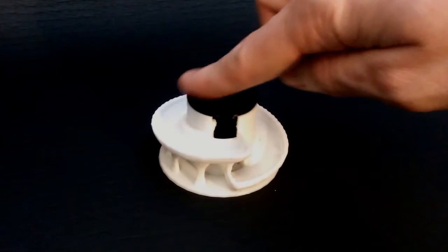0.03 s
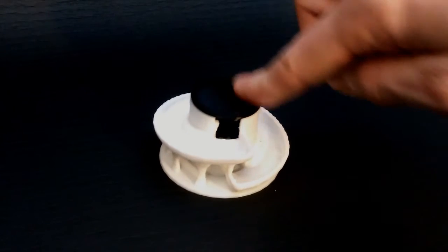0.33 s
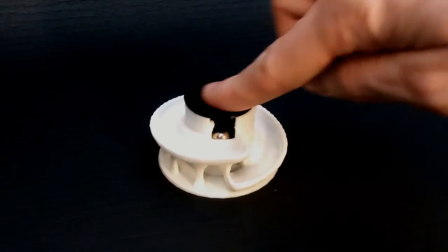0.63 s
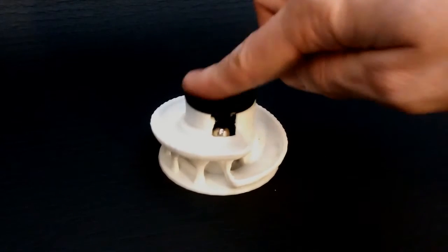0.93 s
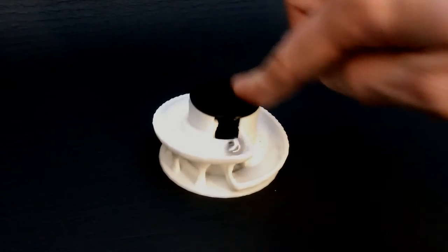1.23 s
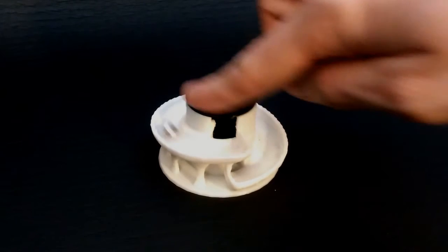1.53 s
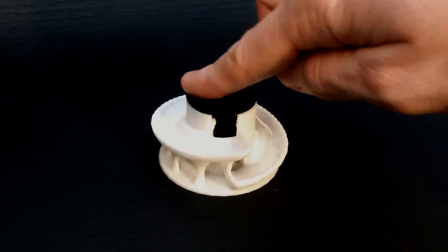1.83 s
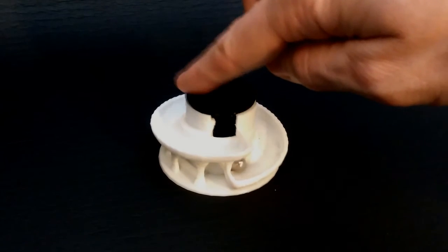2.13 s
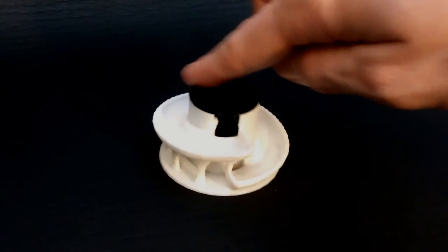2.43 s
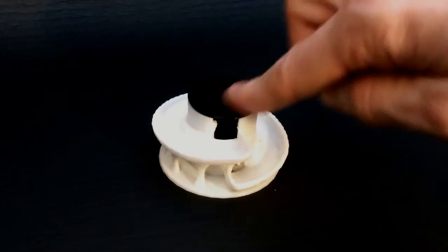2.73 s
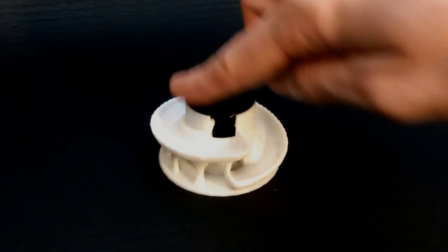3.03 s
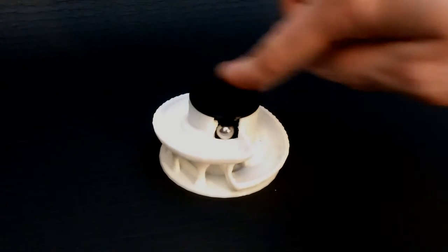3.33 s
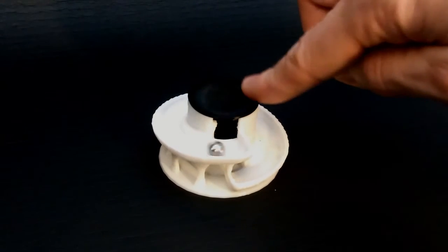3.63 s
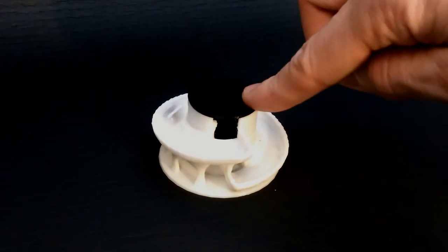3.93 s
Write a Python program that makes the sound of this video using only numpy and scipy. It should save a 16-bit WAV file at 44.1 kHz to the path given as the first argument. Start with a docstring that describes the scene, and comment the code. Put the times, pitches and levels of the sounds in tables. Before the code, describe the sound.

A toy marble run clatters on a tabletop in a small room. Its plastic screw lift knocks and creaks, then a steel ball rattles down the track. The knocking returns and a second roll follows.

```python
"""A toy marble run

A finger turns the screw lift of a small plastic marble run on a tabletop. The screw rubs, creaks and
knocks in its tube; twice a steel ball drops out at the top and rolls, rattling, down the spiral track.
Each contact excites the resonances of the plastic. A small room answers, over a faint rumble and hum
and one distant tick."""
import sys
import numpy as np
from scipy import signal
from scipy.fft import rfft, irfft
from scipy.io import wavfile

SR = 44100
rng = np.random.default_rng(int(sys.argv[2]) if len(sys.argv) > 2 else 0)


def pcm_store(signal):
    """Save signal as 16-bit PCM."""
    levels = np.round(np.clip(np.atleast_2d(signal), -1, 1) * 32767)
    wavfile.write(sys.argv[1], SR, levels.astype(np.int16).T)


N = 176400

# Spectrum of the room's rumble. Each row: frequency in Hz, relative spectral level in dB.
RUMBLE_SPECTRUM = [(25,-13),(60,-3),(135,8),(270,-6),(1500,-10),(7000,-35)]
# Steady hum. Each row: frequency in Hz, rms level in dB.
HUM_TONES = [(198,-78)]
# Decay of the room. Each row: frequency in Hz, time to fall 60 dB in seconds.
ROOM_DECAY = [(300,0.36),(1700,0.17),(5000,0.21)]
# Strength of the reverberation. Each row: frequency in Hz, gain in dB.
REVERB_GAIN = [(400,-1),(1700,-7),(4200,-5),(6000,-7.5)]
# Resonances of the screw in its tube. Each row: frequency in Hz, width in Hz, relative level in dB.
SCREW_MODES = [(403,80,-7),(540,160,-9.5),(854,137,-2.5),(1033,110,-6.5),(1297,372,-0.5),(1615,109,1),(1852,189,3.5),(2090,447,-2.5),(2390,580,-10.5),(4166,660,-15),(5820,794,-8.5)]
# The screw knocks on its tube. Each row: time in seconds, level in dB, relative treble in dB.
SCREW_KNOCKS = [(0.155,-35,-22),(0.2117,-30,-18),(0.367,-26.5,-23.5),(1.0958,-23,-16.5),(2.6783,-29,-22),(2.6946,-30,-28),
                (2.7869,-22.5,-23),(2.8171,-27,-19),(2.9155,-32.5,-18),(3.1774,-32.5,-17),(3.259,-30,-20.5),(3.3014,-22,-25.5)]
# The screw slips free with a pitched tap. Each row: time in seconds, level in dB, ring in Hz.
SCREW_SLIPS = [(0.596,-33.5,1550),(.605,-35.5,1680),(.694,-40.5,1680),(.735,-50.5,1660),(0.794,-45.5,1650),(.821,-45.5,1610),
               (1.01,-38,1600),(1.066,-30,1590),(2.555,-29,1450),(2.589,-38.5,780),(2.592,-24.5,1510),
               (2.64,-37.5,1790),(2.9452,-27,1730),(2.952,-28,1770),(2.972,-36,810),(2.974,-21.5,1585),(3.003,-28.5,1820),(3.032,-28,1460)]
# The screw rubs round. Each row: start in seconds, length in seconds, level in dB, creak pitch in Hz.
SCREW_RUBS = [(0.136,.12,-46.5,1204),(.27,.22,-56,2200),(0.981,0.21,-47,1730),(2.542,.07,-46,1180),(2.701,0.31,-55.5,1150),(2.98,0.11,-43.5,1660),(3.06,0.27,-50.5,1860),(3.235,0.16,-41,1170)]
# Resonances of the track. Each row: frequency in Hz, width in Hz, relative level in dB.
TRACK_MODES = [(396,65,-7),(504,184,-8.5),(856,130,-12.5),(1350,540,-7),(1600,144,-7.5),(1870,133,-0.5),(2083,190,-3),(2393,800,-10),(3460,550,-12.5),(4363,570,-14),(5770,910,-15.5)]
# Timbre of the track where the ball is. Each row: time in seconds, bass gain in dB,
# relative treble of a bounce in dB, ring in Hz.
TRACK_TIMBRE = [(1.3,-2,-22.5,2080),(1.4,-0.5,-19.5,1730),(1.531,5,-16.5,2230),(1.649,-1,-15.5,1810),(1.79,3,-16.5,1840),(2.0,-37,-11.5,1730),(2.169,-11,-14.5,1720),(3.58,1,-21.5,2030),(3.9,0,-22,2340)]
# The ball strikes the track. Each row: time in seconds, level in dB.
BALL_BOUNCES = [(1.2175,-31),(1.2415,-28.5),(1.2809,-37.5),(1.316,-25),(1.3964,-35),(1.4721,-31.5),(1.518,-35),(1.5466,-31),(1.589,-33),
                (1.6756,-32.5),(1.7192,-42),(1.729,-32),(1.7609,-25.5),(1.7735,-24.5),(1.8339,-28),(1.864,-43),(1.906,-35.5),
                (2.0315,-32),(2.0797,-32.5),(2.1076,-35.5),(2.1646,-31),(2.2078,-34.5),(2.3304,-37),(3.5428,-41),(3.5658,-53),(3.577,-21.5),(3.5823,-30.5),
                (3.6091,-29),(3.661,-39.5),(3.752,-35),(3.7836,-48),(3.8144,-39),(3.8708,-35),(3.9042,-30.5),(3.918,-34.5)]
# Rolling, one list for each run of the ball. Each row: time in seconds, level in dB.
BALL_RUNS = [
    [(1.22,-51.5),(1.35,-52.5),(1.58,-48),(1.97,-45),(2.13,-56),(2.3,-84)],
    [(3.54,-50.5),(3.62,-52),(3.73,-62.5),(3.8,-47.5),(3.88,-54.5),(4,-45)],
]

TAPS = 4096  # samples in the response to one contact
HZ = np.fft.rfftfreq(TAPS, 1 / SR)


def undb(db):
    """Amplitude ratio of a level in decibels."""
    return 10 ** (np.asarray(db) / 20)


def unit(x):
    """Normalisation to an rms of 1."""
    return x / np.sqrt(np.mean(x ** 2) + 1e-20)


def read(points, hz):
    """Interpolation of a table on a logarithmic frequency axis."""
    f, value = np.transpose(points)
    return np.interp(np.log(hz + 1), np.log(f + 1), value)


def add(mix, start_s, sound):
    """Superposition: a sound joins the mix at its start time."""
    part = mix[max(round(start_s * SR), 0):][:len(sound)]
    part += sound[:len(part)]


def minimum_phase(gain):
    """Minimum phase gives the most compact causal impulse response with this gain on HZ."""
    log_gain = np.log(np.maximum(gain, gain.max() * 1e-5))
    log_spectrum = signal.hilbert(np.r_[log_gain, log_gain[-2:0:-1]]).conj()
    return np.fft.ifft(np.exp(log_spectrum)).real


def bands(bass_hz=667, treble_hz=3010, order=16):
    """Complementary crossover: bass, middle and treble weights that sum to 1."""
    bass = 1 / (1 + (HZ / bass_hz) ** order)
    treble = 1 - 1 / (1 + (HZ / treble_hz) ** order)
    return bass, 1 - bass - treble, treble


def resonate(x, hz, width_hz):
    """Forced vibration of a damped resonator of gain 1 whose frequency follows the curve hz."""
    turn = np.exp(2j * np.pi * np.cumsum(hz) / SR)
    pole = np.exp(-np.pi * width_hz / SR)
    return 2 * (turn * signal.lfilter([1 - pole], [1, -pole], x / turn)).real


def background(rumble_db=-70):
    """Ambient noise: a continuous spectrum of rumble and a single line of hum."""
    t = np.arange(N) / SR
    spectrum = undb(read(RUMBLE_SPECTRUM, np.fft.rfftfreq(N, 1 / SR)))
    rumble = irfft(rfft(rng.standard_normal(N)) * spectrum, N)
    hum = sum(undb(db) * np.sqrt(2) * np.sin(2 * np.pi * (hz * t + rng.random())) for hz, db in HUM_TONES)
    return undb(rumble_db) * unit(rumble) + hum


def far_tick(start_s=2.413, level_db=-52, band_hz=(1900, 6000), rise_s=0.0065, t60_s=0.18):
    """Diffuse field: a tick from across the room arrives nearly all as echo, a decaying band of noise."""
    t, out = np.arange(SR // 2) / SR, np.zeros(N)
    bandpass = signal.butter(1, band_hz, "band", fs=SR, output="sos")
    noise = unit(signal.sosfilt(bandpass, rng.standard_normal(len(t))))
    envelope = np.minimum(t / rise_s, 1) * 1000 ** (-t / t60_s)
    add(out, start_s, undb(level_db) * envelope * noise)
    return out


def room(x, gap_s=.004):
    """Reverberation: dense reflections decay exponentially, each band at its own rate."""
    reflections = rng.standard_normal(SR // 2) * (rng.random(SR // 2) < .1)
    hz, t, spectra = signal.stft(reflections, SR, nperseg=256)
    t60 = read(ROOM_DECAY, hz)[:, None]
    tail = signal.istft(spectra * 1000 ** (-t / t60) / np.sqrt(t60), SR, nperseg=256)[1]
    tail = signal.fftconvolve(tail / np.linalg.norm(tail), minimum_phase(undb(read(REVERB_GAIN, HZ))))
    out = np.zeros(N)
    add(out, gap_s, signal.fftconvolve(x, tail))
    return out


def struck_spot(modes, spread_db=1.3, low_cut_hz=290):
    """Modal response of a plastic part: each random point of impact weights the modes differently."""
    hz, width, db = np.transpose(modes)[:, :, None]
    peaks = undb(db + spread_db * rng.standard_normal(db.shape)) / (1 + (2 * (HZ - hz) / width) ** 2)
    return np.sqrt((peaks ** 2).sum(0)) / np.sqrt(1 + (low_cut_hz / (HZ + 1)) ** 8)


def ringing(gain, scatter_s=0.0022):
    """Impulse response of the shell: low modes ring at once, the treble scatters through the plastic."""
    treble, t = bands()[2], np.arange(TAPS // 4) / SR
    scatter = rng.standard_normal(len(t)) * np.exp(-t / scatter_s)
    scattered = signal.fftconvolve(minimum_phase(gain * treble), scatter / np.linalg.norm(scatter))
    return minimum_phase(gain * (1 - treble)) + scattered[:TAPS]


def impact(gain, level_db, treble_db, rebound, bass_db=None, rebounds=4, chatter_s=.007, span_s=0.0052):
    """An impact and its rebounds: the hardness of the contact sets the balance of the bands."""
    bass, middle, treble = bands()
    gain = gain / abs(minimum_phase(gain * middle)).max()
    # Bass and treble are set as rms over span_s, relative to the peak of the middle band.
    rms = lambda band: np.sqrt(np.sum(irfft(gain * band) ** 2) / (span_s * SR))
    bass_gain = 1 if bass_db is None else undb(bass_db) / rms(bass)
    treble_gain = undb(treble_db) / rms(treble)
    ring = ringing(gain * (bass_gain * bass + middle + treble_gain * treble))
    out = ring.copy()
    for delay, sign in zip(rng.uniform(.15, 1, rebounds) * chatter_s, rng.choice([-1, 1], rebounds)):
        add(out, delay, rebound * sign * ring)
    return undb(level_db) * out


def contacts(envelope, spots, per_s, spread_db):
    """Shot noise: small, loosely regular contacts each ring one spot; the envelope sets their rms."""
    count = int(len(envelope) / SR * per_s * 2) + 10
    at = np.cumsum(rng.gamma(2, 1 / 2, count) * SR / per_s).astype(int)
    size = unit(undb(spread_db * np.clip(rng.standard_normal(count), -2, 2))) * np.sqrt(SR / per_s)
    spot = rng.integers(0, len(spots), count)
    inside = at < len(envelope)
    trains = np.zeros((len(spots), len(envelope)))
    trains[spot[inside], at[inside]] = size[inside]
    rings = [ringing(gain) for gain in spots]
    return sum(signal.oaconvolve(train * envelope, ring / np.linalg.norm(ring))
               for train, ring in zip(trains, rings))


def screw_taps(rebound=0.58, ring_db=24, ring_width_hz=510, hardening=0.91):
    """Impact excitation: slack lets the screw knock, and it slips free with a short pitched tap."""
    out = np.zeros(N)
    for start, db, treble_db in SCREW_KNOCKS:
        add(out, start, impact(struck_spot(SCREW_MODES), db, treble_db, rebound, bass_db=-24))
    for start, db, hz in SCREW_SLIPS:
        ring = undb(ring_db / (1 + (2 * (HZ - hz) / ring_width_hz) ** 2))
        treble_db = -4 + hardening * db  # a stronger slip is brighter
        add(out, start, impact(struck_spot(SCREW_MODES) * ring, db, treble_db, rebound, bass_db=-29))
    return out


def screw_friction(grit_db=-8, creak_db=3, creak_width_hz=260, arch_share=0.061, rise=0.13, fall=0.34):
    """Stick-slip friction: each push rubs the screw along its tube, with a creak that rises and falls."""
    out = np.zeros(N)
    for start, length, db, hz in SCREW_RUBS:
        progress = np.linspace(0, 1, int(length * SR))
        push = undb(db) * np.minimum(1, np.minimum(progress / rise, (1 - progress) / fall))
        spots = [struck_spot(SCREW_MODES) for _ in range(5)]
        rub = contacts(push, spots, per_s=110, spread_db=3)
        rub += contacts(push * undb(grit_db), spots, per_s=900, spread_db=4)
        arch = np.sin(np.pi * np.minimum(np.arange(len(rub)) / len(push), 1)) - .5
        creak = resonate(rub, hz * (1 + arch_share * arch), creak_width_hz)
        add(out, start, .5 * rub + undb(creak_db) * creak)
    return out


def rolling(t, tick_db=-1, rumble_db=-13, treble_db=-8):
    """Roughness excitation: the rolling ball ticks over ridges, and finer contacts merge into a rumble."""
    envelope = sum(undb(np.interp(t, *np.transpose(run), left=-np.inf, right=-np.inf))
                   for run in BALL_RUNS)
    spots = [struck_spot(TRACK_MODES) * undb(treble_db * bands()[2]) for _ in range(6)]
    ticks = contacts(envelope * undb(tick_db), spots, per_s=110, spread_db=3)
    rumble = contacts(envelope * undb(rumble_db), spots, per_s=900, spread_db=4)
    return (ticks + rumble)[:N]


def ball(bass_hz=1000, ring_width_hz=130, roll_ring_db=3, bounce_ring_db=-5):
    """A moving source: the ball rolls and bounces between the walls; the ring shifts as it circles."""
    t, bounces = np.arange(N) / SR, np.zeros(N)
    when, bass_db, treble_db, ring_hz = np.transpose(TRACK_TIMBRE)
    for start, db in BALL_BOUNCES:
        bounce = impact(struck_spot(TRACK_MODES), db, np.interp(start, when, treble_db), rebound=0.5)
        add(bounces, start, bounce)
    roll = rolling(t)
    drive = undb(roll_ring_db) * roll + undb(bounce_ring_db) * bounces
    track = bounces + roll + resonate(drive, np.interp(t, when, ring_hz), ring_width_hz)
    lowpass = np.interp(np.fft.rfftfreq(N, 1 / SR), HZ, bands(bass_hz)[0])
    bass = irfft(rfft(track) * lowpass, N)
    return track + bass * (undb(np.interp(t, when, bass_db)) - 1)


def scene():
    """Superposition of the toy's direct sound, its reverberation and the ambient sounds."""
    toy = screw_taps() + screw_friction() + ball()
    return (toy + room(toy) + far_tick() + background())[None]


def record(dry, dull_hz=8800, edge_hz=9900):
    """Low-pass filtering: a microphone with a dull top, then a steep band limit."""
    dull = signal.sosfilt(signal.butter(4, dull_hz, fs=SR, output="sos"), dry)
    band_limit = signal.firwin(511, edge_hz, window=("kaiser", 9), fs=SR)
    return signal.oaconvolve(dull, band_limit[None], "same")


dry = scene()
out = record(dry)
pcm_store(out)
```